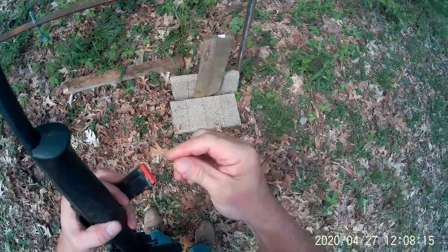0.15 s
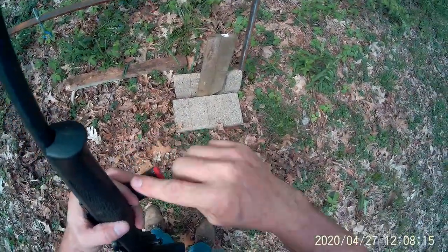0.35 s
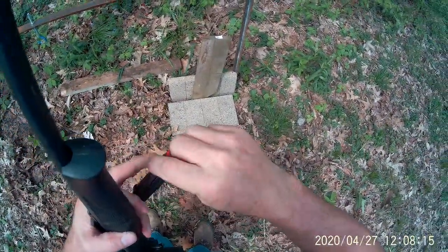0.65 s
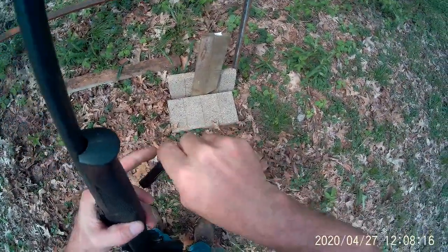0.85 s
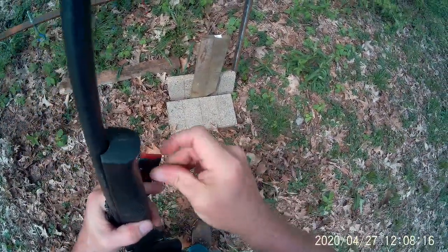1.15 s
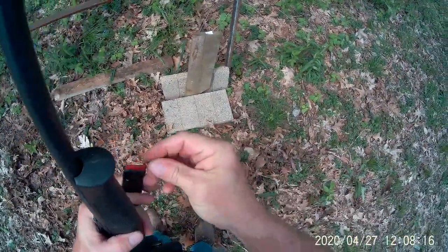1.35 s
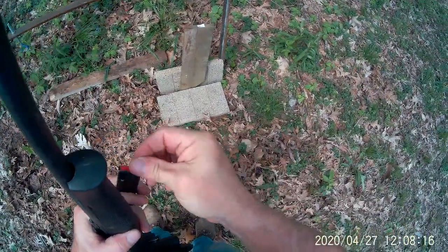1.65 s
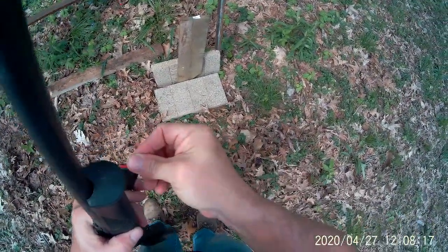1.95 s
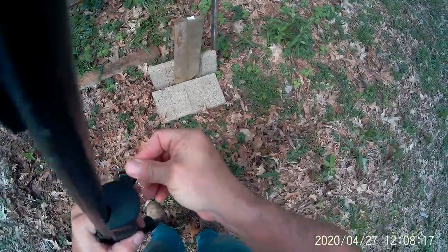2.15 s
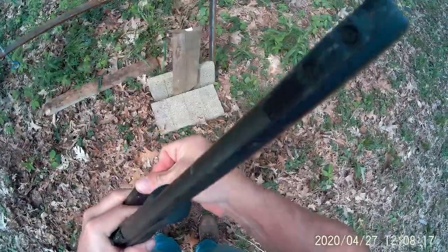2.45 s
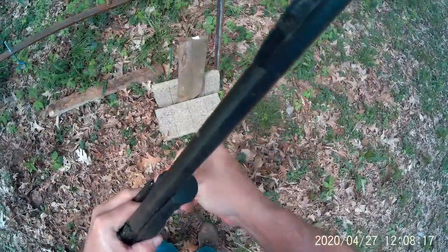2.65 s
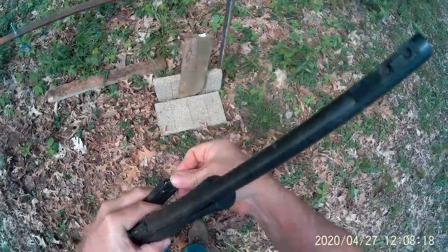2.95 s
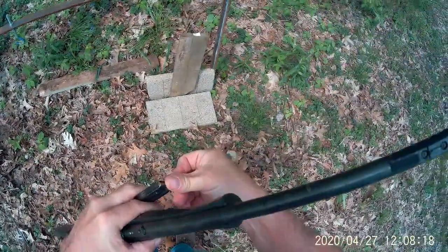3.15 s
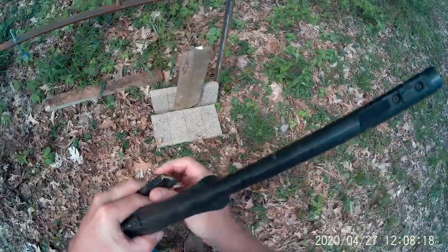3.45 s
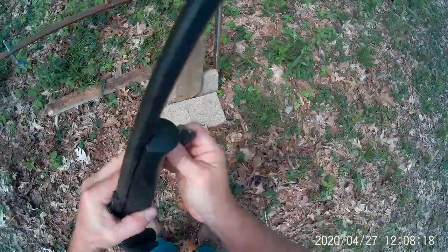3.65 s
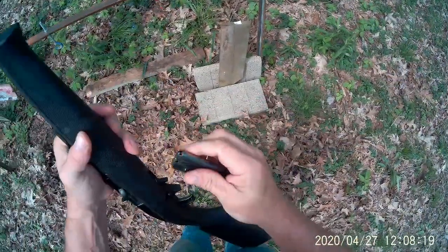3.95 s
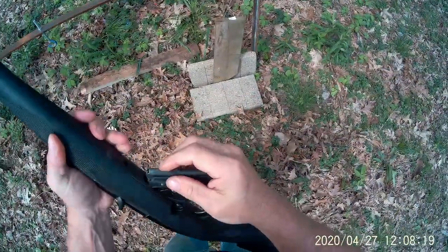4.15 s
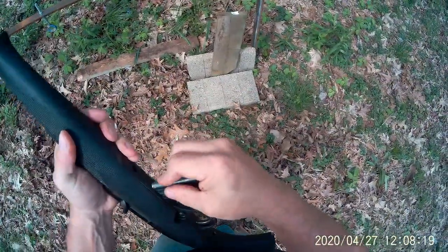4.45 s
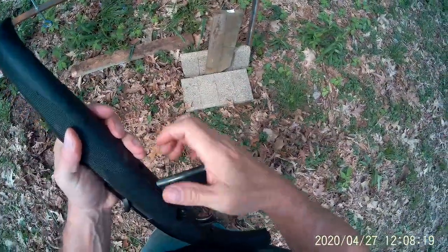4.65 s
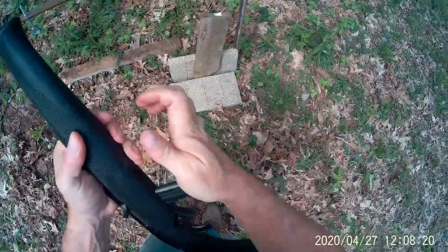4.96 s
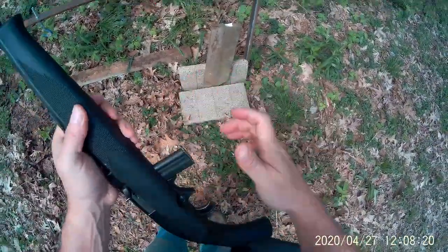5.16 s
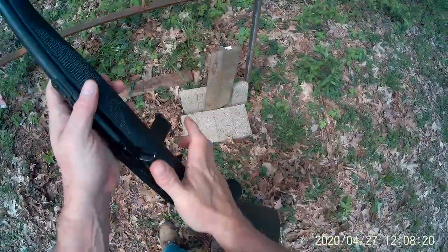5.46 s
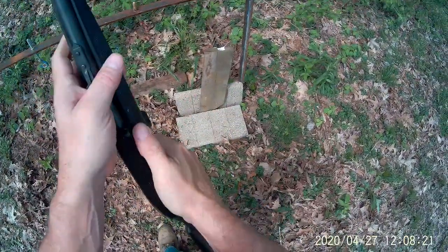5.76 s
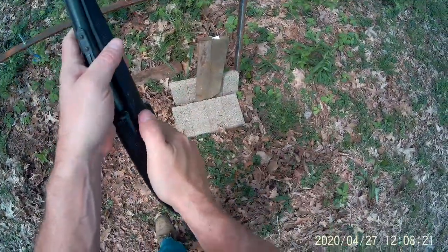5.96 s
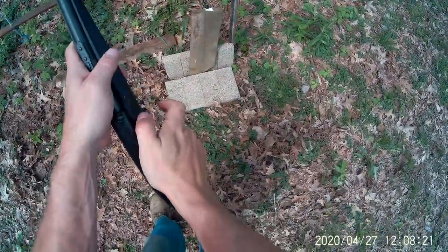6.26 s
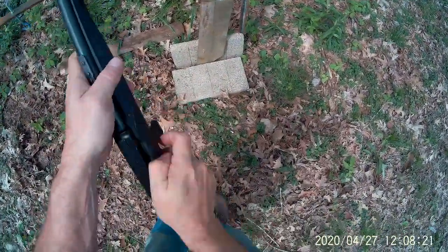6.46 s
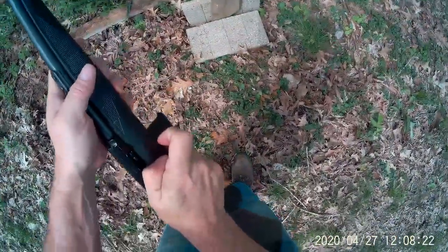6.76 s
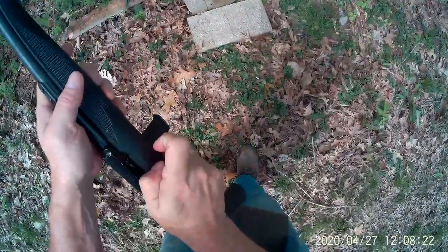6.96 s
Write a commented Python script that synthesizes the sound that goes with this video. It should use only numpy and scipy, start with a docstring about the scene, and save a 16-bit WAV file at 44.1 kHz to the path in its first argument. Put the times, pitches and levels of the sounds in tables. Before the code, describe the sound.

Small metal cartridges click into a magazine close by, then the magazine is slapped hard into a rifle and the bolt clacks shut, outdoors.

```python
"""Outdoors in a yard, close to a body camera's microphone: small cartridges are thumbed into a box magazine.
One snaps under the feed lips; the magazine is fumbled into a rifle and slapped home, then the bolt is let forward.
Each contact is a burst of grinding that sets the modes of the struck part ringing; hard blows rattle the rounds.
Fingers rub as swells of filtered noise, the yard gives back a short scatter, and soft noise makes the air."""
import sys
import numpy as np
from scipy import signal
from scipy.fft import rfft, irfft
from scipy.io import wavfile

SR = 44100
rng = np.random.default_rng(int(sys.argv[2]) if len(sys.argv) > 2 else 0)


def to_wav(sig):
    """Store sig (one row per channel, or 1-D mono) as 16-bit WAV at the path in sys.argv[1].

    Samples outside -1..1 are clipped; the rate is SR.
    """
    pcm = np.clip(np.atleast_2d(sig), -1, 1) * 32767
    pcm = np.round(pcm).astype(np.int16)
    wavfile.write(sys.argv[1], SR, pcm.T)  # frames by channels


N = 313551


def from_db(db):
    """Amplitude factor of a level in dB."""
    return 10 ** (np.asarray(db) / 20)


def unit(x):
    """Scales a sound to an energy of one."""
    return x / np.sqrt(np.sum(x ** 2) + 1e-20)


def dying(t, t60):
    """An exponential envelope that falls 60 dB in t60 seconds."""
    return np.exp(-np.log(1000) * t / max(t60, 1e-4))


def add(out, s, sound):
    """Mixes a sound in at a time in seconds."""
    at = max(round(s * SR), 0)
    out[at:at + len(sound)] += sound[:max(N - at, 0)]


def colour(x, spectrum, tilt_db=0, size=8192):
    """Causal minimum-phase filter with the given relative spectrum, tilted in dB per octave above 1 kHz."""
    octave = np.log2(np.maximum(np.arange(size // 2 + 1), 1) * SR / size)
    hz, db = np.transpose(spectrum)
    shape = np.interp(octave, np.log2(hz), db) + tilt_db * np.maximum(octave, 10)
    # Folding the cepstrum onto positive times gives the minimum phase
    cepstrum = irfft(np.log(from_db(shape - shape.max())))
    cepstrum[1:size // 2] *= 2
    cepstrum[size // 2 + 1:] = 0
    impulse = irfft(np.exp(rfft(cepstrum)))
    return signal.fftconvolve(x, impulse)[:len(x)]


def air(level_db):
    """Soft, dull outdoor air behind everything: coloured noise that swells slowly."""
    # Spectrum of the air: (frequency [Hz], relative level [dB per Hz])
    air_colour = [(12, -30), (20, 0.5), (129, -1), (213, -1), (252, -2), (324, -3.5), (519, -6), (857, -10),
                  (1130, -12.5), (1230, -13.5), (1340, -15), (4950, -27.5), (9660, -29.5), (13500, -28.5),
                  (15500, -35)]
    # Swell of the air, before level_db is added: (time [s], level [dB])
    air_swell = [(0.0, -65), (1.23, -64.5), (2.57, -64.5), (4.32, -64), (4.71, -61.5), (5.96, -65),
                 (7.11, -63.5)]
    s, db = np.transpose(air_swell)
    swell = from_db(level_db + np.interp(np.arange(N) / SR, s, db))
    noise = colour(rng.standard_normal(N), air_colour)
    return swell * np.sqrt(N) * unit(noise)   # sqrt(N) brings the noise to an rms of one


def yard(x, near_db, near_t60, far_db, far_t60, far_tilt_db):
    """Leaf litter scatters the sound back almost at once; trees return a faint, duller, longer tail."""
    t = np.arange(SR) / SR
    arrival = np.clip(t / 0.007 - .5, 0, 1)   # silent for 3.5 ms, full at 10.5 ms
    near = unit(rng.standard_normal(SR) * dying(t, near_t60) * arrival)
    far_noise = rng.standard_normal(SR) * dying(t, far_t60) * arrival
    nearly_flat = [(100, 0.0013), (10000, 0.0014)]   # (Hz, dB); the tilt does the dulling
    far = unit(colour(far_noise, nearly_flat, far_tilt_db))
    return signal.fftconvolve(x, from_db(near_db) * near + from_db(far_db) * far)[:N]


def rubbing(grain_db):
    """Fingers and sliding steel: swells of noise whose tiny slips vary in strength."""
    # Rubs: (middle [s], half length [s], level [dB])
    rubs = [(0.663, .09, -78), (1.165, 0.042, -70), (1.705, .041, -75), (3.338, 0.031, -68.5),
            (4.434, 0.21, -73), (5.549, 0.18, -71), (6.22, 0.037, -73.5), (6.534, 0.021, -64.5)]
    # Spectrum of the rubs: (frequency [Hz], relative level [dB per Hz])
    rub_colour = [(300, -20), (1500, 1.5), (3800, -3.5), (6000, -6), (9500, -4), (12000, -10), (14000, -6),
                  (16000, -32)]
    t = np.arange(N) / SR
    pressure = sum(from_db(db) * np.exp(-((t - s) / half) ** 2) for s, half, db in rubs)
    noise = rng.standard_normal(N)
    grain = np.repeat(rng.standard_normal(N // 64 + 1), 64)[:N]   # a new strength every 64 samples
    slips = noise * from_db(grain_db * grain)
    return pressure * np.sqrt(N) * unit(colour(slips, rub_colour))


def grinding(t, length, rough_db):
    """Force of a contact: uneven tiny impacts that die away, with no pitch favoured."""
    force = rng.standard_normal(len(t)) * from_db(rough_db * rng.standard_normal(len(t)))
    envelope = dying(t, 2 * length)
    spectrum = rfft(force * envelope)
    flattened = irfft(spectrum / (abs(spectrum) + 1e-12), len(t))
    return unit(flattened * np.sqrt(envelope))


def accent(x, spot_hz, width, spot_db):
    """The very spot that is struck adds a broad, quickly damped resonance of its own."""
    b, a = signal.iirpeak(min(spot_hz, .45 * SR), 1 / width, fs=SR)
    resonance = unit(signal.lfilter(b, a, x))
    return unit(unit(x) + from_db(spot_db) * resonance)


def cluster(t, hz, t60, split):
    """A mode of an assembly is split into six close neighbours, which beat as they die."""
    neighbours = hz * (1 + split * rng.standard_normal((6, 1)))
    beating = np.cos(2 * np.pi * neighbours * t).sum(0)
    return beating * dying(t, t60) * np.where(t > 0, 1, .5)


def blows(rows, modes, crack, rough_db, split, spot_db, size=12288):
    """Each contact gives a dry crack, which sets the modes of the part ringing."""
    out, t = np.zeros(N), np.arange(size) / SR
    strengths = from_db(np.array(modes)[:, 1])
    reference = np.sqrt(.003 * SR)   # a level is the rms that the blow would have over 3 ms
    for s, db, grind, tilt_db, ring_db, spot_hz in rows:
        force = colour(grinding(t, grind, rough_db), crack, tilt_db)
        contact = accent(force, spot_hz, .11, spot_db)
        # The grip shifts the modes between blows
        rings = np.array([cluster(t, hz, t60, split) for hz, _, t60 in modes])
        driven = signal.fftconvolve(rings, contact[None], axes=1)[:, :size]
        ring = unit(sum(g * unit(mode) for g, mode in zip(strengths, driven)))
        blow = unit(contact + from_db(ring_db) * ring)
        add(out, s, reference * from_db(db) * blow)
    return out


def voiced(rows, tilt_db, ring_db, tilt_per_octave_db=0, ring_per_octave_db=0):
    """Tilt and ring may follow the pitch of the spot struck; a longer contact damps the ring."""
    usual_spot_hz, usual_grind_s = 5000, .007
    damping_db = 2.5   # ring lost for each doubling of the contact time
    s, db, grind, spot_hz = np.transpose(rows)
    octaves = np.log2(spot_hz / usual_spot_hz)
    tilt = tilt_db + tilt_per_octave_db * octaves
    damping = damping_db * np.log2(grind / usual_grind_s)
    ring = ring_db + ring_per_octave_db * octaves - damping
    return np.column_stack([s, db, grind, tilt, ring, spot_hz])


def bounces(count):
    """A hard blow leaves the rounds rattling: a run of ever weaker bounces of the cases."""
    # Rattles: (time of the first bounce [s], its level [dB])
    rattles = [(1.176, -59), (2.231, -39), (3.1560, -60), (4.5982, -54), (5.0460, -31), (6.5830, -58)]
    spacing_s, loss_db = 0.012, 7   # time between bounces, and what each one loses
    grind_s, rim_hz = 0.027, 10100   # grinding time of a bounce, and the pitch of a case rim
    return [(s + k * spacing_s, db - k * loss_db, grind_s, rim_hz)
            for s, db in rattles for k in range(count)]


def wall_knocks(rows):
    """What the bouncing cases pass on to the magazine wall, weaker and lower in pitch."""
    wall_db, wall_hz = -9, 3930   # level against the bounce, and pitch
    return [(s, db + wall_db, grind, wall_hz) for s, db, grind, _ in rows]


def brass_touches(rattle):
    """Light touches of brass and steel, and the rattling cases, ring small high modes."""
    # Touches: (time [s], level [dB], grinding time [s], pitch of the spot struck [Hz])
    touches = [(.7528, -60, 0.011, 5370), (1.0481, -60.5, .007, 8600), (1.1000, -50, 0.017, 5930),
               (1.8857, -61.5, 0.02, 9500), (3.0102, -60, 0.013, 11000), (3.3165, -59, 0.022, 9800),
               (3.6692, -57, 0.017, 9900), (4.2543, -54, 0.0087, 6540), (4.3297, -48.5, .01, 3420),
               (4.4279, -57.5, .022, 3500), (4.4770, -54, 0.012, 4530), (4.5342, -61, 0.012, 12000),
               (4.6769, -49, 0.0075, 4270), (5.6167, -56, .0043, 7700), (5.6776, -60.5, 0.0049, 8000),
               (6.4990, -53, 0.0042, 8650), (6.5065, -59, .004, 7500)]
    # Ringing of the brass: (frequency [Hz], relative level [dB], t60 [s])
    brass_modes = [(9250, -5, 0.061), (10200, -0.5, .035), (11200, -11.5, .04), (13200, -11, .04)]
    # Dense, short-lived modes of a touch: (frequency [Hz], relative level [dB per Hz])
    touch_crack = [(300, -19.5), (2000, -11.5), (3800, -3.5), (8000, 2.5), (11000, -2.5), (12200, -6),
                   (14000, -1.5), (16000, -7)]
    touched = voiced(touches, tilt_db=-2.5, ring_db=-9.5, tilt_per_octave_db=4.5, ring_per_octave_db=4)
    rattled = voiced(rattle, tilt_db=3.5, ring_db=3)
    return blows([*touched, *rattled], brass_modes, touch_crack, rough_db=7.0, split=0.015, spot_db=-10)


def magazine_loading(rattle):
    """Cartridges pressed on the follower and feed lips, and rattling cases, ring the magazine."""
    # Presses: (time [s], level [dB], grinding time [s], pitch of the spot struck [Hz])
    presses = [(1.1435, -53, 0.013, 4280), (1.1703, -46, 0.002, 5700), (1.8857, -64, .012, 3550),
               (2.2241, -29.5, 0.0037, 3760), (3.1299, -49.5, 0.009, 6700), (3.1395, -48, 0.017, 8100),
               (3.6692, -56.5, 0.0076, 3630)]
    # Ringing of the magazine: (frequency [Hz], relative level [dB], t60 [s])
    magazine_modes = [(1908, -31.5, 0.034), (3700, -1, 0.013), (3730, -26, 0.048), (5760, -9.5, 0.00883),
                      (6700, -24.5, 0.037), (7187, -16, 0.055), (8560, -13.5, 0.028)]
    # Dense, short-lived modes of the magazine: (frequency [Hz], relative level [dB per Hz])
    magazine_crack = [(200, -31.5), (1200, -23.5), (1900, -1), (3100, -6.5), (3800, 1.5), (5000, 8.5),
                      (6200, 12.5), (8300, -4.5), (9300, -18), (16000, -58)]
    pressed = voiced(presses, tilt_db=-2.5, ring_db=-1.5, tilt_per_octave_db=4.5, ring_per_octave_db=-31)
    knocked = voiced(wall_knocks(rattle), tilt_db=-8, ring_db=2.5)
    return blows([*pressed, *knocked], magazine_modes, magazine_crack,
                 rough_db=2.5, split=0.0082, spot_db=-4.5)


def bolt_closing():
    """The bolt is released, strips a round and closes: rough contacts ring its heavy steel."""
    # Contacts: (time [s], level [dB], grinding time [s], pitch of the spot struck [Hz])
    bolt_contacts = [(6.5425, -32, 0.019, 3930), (6.5565, -34, 0.019, 7960), (6.5600, -22, 0.0079, 6060),
                     (6.5670, -37, 0.013, 3800)]
    # Ringing of the bolt: (frequency [Hz], relative level [dB], t60 [s])
    bolt_modes = [(335, -19.5, 0.032), (577, -1, 0.013), (990, 0, 0.048), (1204, -3.5, 0.057),
                  (1590, 0, 0.012), (1750, -9, .02), (2800, -6, 0.032), (3460, -2, 0.04), (4120, -3, 0.026),
                  (5280, 1, 0.044), (6520, 1, 0.019), (7000, -19, .016), (7850, -14, .024)]
    # Dense, short-lived modes of the bolt: (frequency [Hz], relative level [dB per Hz])
    bolt_crack = [(100, -33), (300, -10.5), (570, -9.5), (820, -9.5), (1600, -4.5), (2300, -3.5), (3200, 1),
                  (4800, -4.5), (6800, 2.5), (8200, 8), (9100, -33), (16000, -51)]
    closed = voiced(bolt_contacts, tilt_db=0.0, ring_db=-1, tilt_per_octave_db=1.0)
    return blows(closed, bolt_modes, bolt_crack, rough_db=6, split=0.0073, spot_db=-10)


def magazine_seating():
    """The magazine finds the well, slides past the catch and seats: the receiver rings."""
    # Contacts: (time [s], level [dB], grinding time [s], pitch of the spot struck [Hz])
    well_contacts = [(4.2972, -49, 0.0085, 3200), (4.4644, -54, 0.0077, 3400), (4.5780, -47, .019, 8450),
                     (4.5824, -39, 0.0061, 5100), (5.0148, -37.5, 0.015, 6000),
                     (5.0177, -23.5, 0.018, 5000), (5.0250, -15.5, 0.0056, 6400),
                     (5.0268, -13.5, 0.0073, 4000), (5.0284, -15, 0.005, 4400)]
    # Ringing of the receiver: (frequency [Hz], relative level [dB], t60 [s])
    receiver_modes = [(295, -26.5, .04), (480.6, -21.5, .07), (1020, -14.5, 0.059), (1240, -14.5, .03),
                      (2000, -12, .025), (2450, -16.5, 0.02), (3500, -7.5, 0.012), (3860, -3.5, 0.01324),
                      (4030, -22.5, 0.209), (4450, -9.5, .009), (4780, -12.5, 0.01189), (5310, -29, .13),
                      (5650, -1, 0.023), (6394, -6, 0.01406), (6850, -7, .012), (7830, -9, 0.033),
                      (8440, -8, .018)]
    # Dense, short-lived modes of the receiver: (frequency [Hz], relative level [dB per Hz])
    receiver_crack = [(40, -11.5), (150, -20), (330, -19.5), (700, -18), (1200, -12), (1600, -14),
                      (2000, -10), (2900, -8), (4200, 0.5), (6500, -2.5), (8300, -1), (9100, -31),
                      (16000, -44)]
    seated = voiced(well_contacts, tilt_db=-0.07, ring_db=-2.5, tilt_per_octave_db=7.5, ring_per_octave_db=-4)
    return blows(seated, receiver_modes, receiver_crack, rough_db=0.5, split=0.0082, spot_db=-8.5)


def scene():
    """The gun in the hands near the microphone, its scatter from the yard and the air."""
    rattle = bounces(count=4)
    magazine = magazine_loading(rattle)
    rifle = magazine_seating() + bolt_closing() + brass_touches(rattle) + rubbing(grain_db=3.0)
    cupped = from_db(-6) * magazine   # the hands close round the magazine, so less of it reaches the yard
    echo = yard(rifle + cupped, near_db=-21, near_t60=0.064, far_db=-29.5, far_t60=.42, far_tilt_db=-5)
    return (magazine + rifle + echo + air(level_db=1.0))[None]


def record(dry):
    """The camera's electronics add a faint steady whine, and a steep filter cuts the top."""
    whine_hz, whine_db = 7840, -96.5   # the level is an rms
    cutoff_hz = 15900
    whine = from_db(whine_db) * np.sqrt(2) * np.sin(2 * np.pi * whine_hz * np.arange(N) / SR)
    low_pass = signal.ellip(10, .2, 70, cutoff_hz, fs=SR, output="sos")
    return signal.sosfilt(low_pass, dry + whine)


dry = scene()
out = record(dry)
to_wav(out)
```